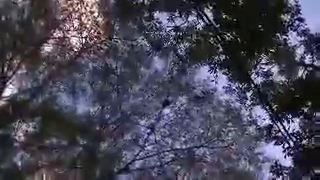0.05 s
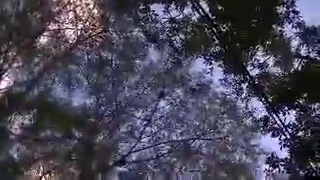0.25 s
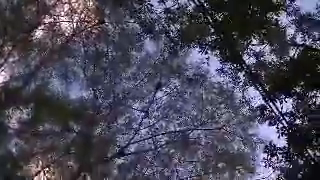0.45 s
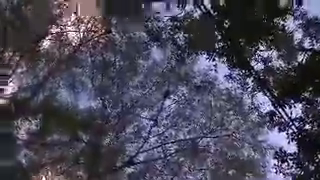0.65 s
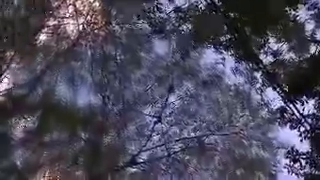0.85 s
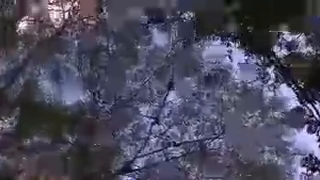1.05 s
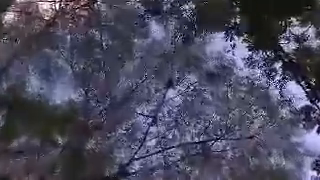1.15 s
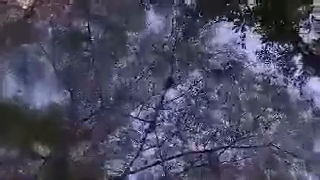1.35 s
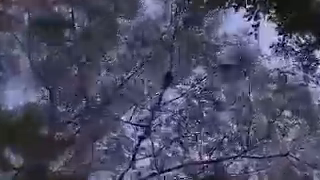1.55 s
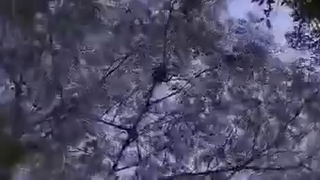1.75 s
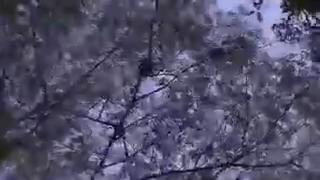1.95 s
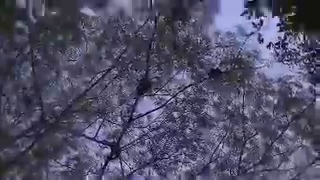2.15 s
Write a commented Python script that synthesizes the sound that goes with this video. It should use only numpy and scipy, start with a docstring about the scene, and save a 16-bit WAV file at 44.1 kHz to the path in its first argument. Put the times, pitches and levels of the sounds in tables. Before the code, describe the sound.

A howler monkey gives two short, hoarse barks over forest hiss, then a sharp snap.

```python
"""An earlier bark dies away among the trunks, over forest hiss, small chirps and a low motor hum.
A howler monkey then barks twice in the treetops, with faint ticks close by: the harmonics of its vocal
folds arch up and down through the throat's resonances, a rasp rides on top, and each hoot echoes.
After the barks a faint far tone stands out. Near the end one sharp snap rings briefly in its bright
modes, and a last tick follows."""
import sys
import numpy as np
from scipy import signal
from scipy.fft import rfft, irfft
from scipy.io import wavfile
from scipy.ndimage import uniform_filter1d

SR = 44100
rng = np.random.default_rng(int(sys.argv[2]) if len(sys.argv) > 2 else 0)


def log_audio(samples):
    """Write samples as a 16-bit WAV file to the path given in sys.argv[1]."""
    # one column per channel
    frames = np.atleast_2d(samples).T
    # limit to full scale, then quantise
    limited = np.clip(frames, -1, 1)
    pcm = np.round(limited * 32767).astype(np.int16)
    wavfile.write(sys.argv[1], SR, pcm)


N = 97020
T = np.arange(N) / SR

# course of each bark: t/s, f/Hz, level/dB, relative overtone level/dB, period doubling (0-1)
BARK_CONTOURS = [
    [(.236, 235, -29, 7, 0.02), (.245, 284.3, -21.5, -2, 0), (.252, 324.8, -17, 1.5, 0.06),
     (.264, 354.2, -19, 1, 0.22), (.28, 371.6, -19, 4.5, 0), (.298, 370, -21, -2.5, 0.18),
     (.313, 351.1, -19.5, -12.5, 0.85), (.332, 287.3, -24, -1, 0.1), (.345, 259.1, -20, 0, 0.16),
     (.356, 236.4, -24.5, -11.5, 0.7), (.376, 198.7, -28, -2.5, 0.23), (.405, 171.5, -38, -3.5, 0)],
    [(.714, 239.2, -45, 2, 0), (.724, 288.1, -18, -1, 0.13), (.73, 309.7, -20, 2.5, 0),
     (.742, 351.4, -17.5, 3, 0.2), (.76, 367.4, -18, 5, 0), (.783, 355.7, -18, -2.5, 0),
     (.798, 329, -23, -11, 1), (.81, 279.7, -26, 0.5, 0), (.822, 261.4, -24, -11, 0.98),
     (.836, 215.6, -29, -10.5, 0), (.875, 170, -48, -5, 0.5)],
]
# resonances of the throat: f/Hz, gain/dB
THROAT_RESPONSE = [(70, -57), (160, -8), (230, -8.5), (300, -2), (365, 4), (410, 10), (470, -11.5),
                   (530, -3), (600, -16.5), (725, -15), (770, -17.5), (810, 5.5), (880, 0.5), (980, -33.5),
                   (1090, -23), (1280, -56), (1390, -17), (1455, -11), (1560, -37.5), (1820, -34),
                   (2000, -49), (2100, -16.5), (2300, -72.5), (4000, -55)]
# spectrum of the rasp: f/Hz, relative level/dB
RASP_SPECTRUM = [(1000, -2.5), (2000, -8), (2500, -14.5), (3000, -10), (3650, -16), (4100, 7.5), (4400, 0),
                 (4680, -2.5), (5200, 6), (6000, -5), (6500, -8.5), (7150, -24.5), (8100, -15.5),
                 (10000, -27.5), (15000, -32)]
# reflections off trunks: delay t/s, gain/dB
TRUNK_ECHOES = [(.052, -20), (.1, -25.5), (.14, -32.5)]
# colour of the echoes and reverberation: f/Hz, gain/dB
WOODS_RESPONSE = [(180, 2), (290, -9), (365, 5), (430, 5.5), (520, -11.5), (720, 10), (830, -4), (1400, -4),
                  (3000, 10.5), (4200, -9), (6000, -4.5)]
# the snap's slip, break and two rebounds: t/s, relative level/dB
SNAP_BLOWS = [(1.792, -24), (1.7935, 0), (1.79469, -7), (1.7966, -21)]
# modes of the snap: f/Hz, relative level/dB, 60 dB decay time t/s
SNAP_RESONANCES = [(2100, -40, 0.0038), (2916, 0.5, 0.0091), (3560, 0.5, 0.0037), (4250, 2, 0.0032),
                   (5070, -0.5, 0.0059), (5890, -2, 0.0041), (7840, -11.5, 0.0029), (9200, -12, 0.0024),
                   (11400, -12, .003), (15600, -11, 0.0012)]
# scatter after the snap: f/Hz, relative level/dB
SCATTER_SPECTRUM = [(1200, -21), (2200, 6), (4000, -1), (4900, 3), (6500, -24), (14000, -28)]
# ticks: onset t/s, level/dB, decay constant t/s
TICK_BURSTS = [(0.289, -30.5, 0.0026), (0.426, -37, 0.0025), (.551, -42, .002), (0.563, -45, 0.0022),
               (0.596, -47.5, 0.0025), (0.623, -40.5, 0.0047), (0.651, -35.5, 0.0056),
               (1.956, -45.5, 0.0079)]
# spectrum of the ticks: f/Hz, relative level/dB
TICK_SPECTRUM = [(800, -55), (2000, 16), (3200, 7.5), (5000, 9), (6400, 10), (8000, -16.5), (13000, -18),
                 (16000, -57)]
# peaks of the chirps: t/s, level/dB
CHIRP_PEAKS = [(.026, -43), (.169, -47.5), (0.473, -45), (0.502, -47), (0.622, -39), (0.919, -41.5),
               (1.066, -46), (1.102, -46), (1.138, -43.5), (1.216, -43.5), (1.286, -44.5), (1.438, -43.5),
               (1.662, -42), (1.886, -44), (2.035, -45), (2.112, -43), (2.184, -46)]
# envelope of the far tone: t/s, level/dB
FAR_ENVELOPE = [(0, -73), (.85, -55), (1.1, -45), (1.55, -50), (1.8, -48), (2.2, -50.5)]
# peaks of low, distant swells: t/s, f/Hz, level/dB
SWELL_PEAKS = [(.63, 280, -53), (1.52, 182, -48.5), (1.85, 183, -50.5)]
# harmonics of the motor: f/Hz, rms level/dB
MOTOR_HARMONICS = [(26.9, -98), (53.8, -56), (80.7, -54.5), (107.7, -54), (134.6, -60)]
# spectrum of the forest hiss: f/Hz, relative level/dB
FOREST_SPECTRUM = [(25, -5), (60, -10.5), (150, -2.5), (220, 0.5), (350, 2.5), (480, -4.5), (700, -6.5),
                   (1020, -6), (1300, -13), (1800, -9), (2500, -18.5), (3700, -17.5), (4150, -14),
                   (4600, -20.5), (5400, -22.5), (7000, -28.5), (10000, -34.5), (15000, -43.5)]


def bark(contour):
    """Source and filter: the throat shapes the vocal folds' harmonics. Returns the hoot and its rasp."""
    times, hz, db, overtone_db, doubling = np.array(contour).T
    onset, attack_s = times[0], .012
    gate = np.sin(np.pi / 2 * np.clip(np.minimum(T - onset, times[-1] - T) / attack_s, 0, 1)) ** 2

    def along(values):
        return smooth(np.interp(T, times, values))

    glide_hz = along(hz)
    grunt = np.clip((269.8 - glide_hz) / 60, 0, 1)  # at low pitch the folds beat unevenly
    jitter = .0042 + .0353 * grunt
    pitch = glide_hz * (1 + jitter * wander(200))
    phase = 2 * np.pi * np.cumsum(pitch) / SR
    shimmer_db = .8 * wander(95)
    level = amp(along(db) + shimmer_db)

    def partial(k):
        return smooth(throat(k * pitch, onset)) * np.sin(k * phase)

    overtones = amp(along(overtone_db)) * sum(partial(k) for k in range(2, 12))
    # period doubling adds half-harmonics, chiefly as the pitch falls
    half_harmonics = np.clip(along(doubling), 0, 1) * sum(partial(k + .5) for k in range(1, 6))
    airflow = 1 + .8 * np.cos(phase)
    breath = amp(-31.5) * airflow * noise(THROAT_RESPONSE)
    hoot = level * (partial(1) + overtones + half_harmonics + breath)
    # the rasp swells in, then follows the hoot's level over a narrower range
    rasp_level = amp(-36) * (level / amp(db.max())) ** .68 * (1 - decay(onset, .0093))
    return gate * hoot, gate * rasp_level * rasp(pitch, glide_hz, phase, airflow)


def throat(hz, onset):
    """Cavity resonance: the throat's gain, plus an open-mouth formant that fades after the onset."""
    mouth_hz, width_hz, open_s = 640, 110, .026
    opening = amp(-4.5) * np.exp(-((T - onset) / open_s) ** 2)
    return gain_at(hz, THROAT_RESPONSE) + opening * np.exp(-((hz - mouth_hz) / width_hz) ** 2)


def rasp(pitch, glide_hz, phase, airflow):
    """Mixed excitation: high harmonics add in power to air noise pulsed by the vocal folds."""
    rest_hz, voiced_share = 324, .75
    formant_shift = (glide_hz / rest_hz) ** .15  # the buzz's resonances rise with pitch
    buzz = sum(gain_at(k * pitch / formant_shift, RASP_SPECTRUM)
               * np.sin(k * phase + 2 * np.pi * rng.random()) for k in range(5, 40))
    air = airflow * noise(RASP_SPECTRUM)
    return np.sqrt(voiced_share) * buzz / buzz.std() + np.sqrt(1 - voiced_share) * air


def woods(hoot, treble):
    """Reflection: the direct sound is followed by discrete trunk echoes and diffuse reverberation."""
    delay_s, build_s, t60_s = .035, .025, .25
    tail = noise(WOODS_RESPONSE) * decay(delay_s, t60_s / np.log(1000)) * (1 - decay(delay_s, build_s))
    reverberation = signal.fftconvolve(hoot + amp(8) * treble, tail / np.linalg.norm(tail))[:N]
    direct = hoot + treble
    echoes = sum(amp(db) * delay(direct, s) for s, db in TRUNK_ECHOES)
    return direct + amp(-14.5) * reverberation + coloured(echoes, WOODS_RESPONSE)


def monkey():
    """Reverberation outlasts its source: the tail of an earlier bark precedes two whole ones."""
    first, second = [woods(*bark(contour)) for contour in BARK_CONTOURS]
    earlier_onset_s, second_onset_s = -.16, BARK_CONTOURS[1][0][0]
    return first + second + amp(-5.5) * delay(second, earlier_onset_s - second_onset_s)


def snap():
    """Impulse response: quick blows excite damped modes; a weak scatter and one mode linger."""
    break_s = SNAP_BLOWS[1][0]
    scatter_t60_s, lingering_t60_s, lingering_hz = .031, .12, 4800
    scatter = amp(-23) * decay(break_s, scatter_t60_s / np.log(1000)) * noise(SCATTER_SPECTRUM)
    lingering = amp(-45) * decay(break_s, lingering_t60_s / np.log(1000))
    sound = scatter + lingering * np.sin(2 * np.pi * lingering_hz * T)
    age = T[:2000]
    ring = sum((-1) ** k * amp(db - 60 * age / t60) * np.sin(2 * np.pi * hz * age)
               for k, (hz, db, t60) in enumerate(SNAP_RESONANCES))
    for s, db in SNAP_BLOWS:
        start = round(s * SR)
        sound[start:start + len(age)] += amp(db - 8) * ring
    return signal.sosfilt(signal.butter(4, 1700, "high", fs=SR, output="sos"), sound)


def ticks():
    """Friction: small dry scrapes give decaying bursts of noise; the first one squeaks upward."""
    squeak_hz, rise_hz_per_s, squeak_s = 5880, 560000, .0012
    age = np.maximum(T - TICK_BURSTS[0][0], 0)
    swell = age / squeak_s * np.exp(1 - 2 * age / squeak_s)
    squeak = swell * np.sin(2 * np.pi * age * (squeak_hz + rise_hz_per_s * age / 2))
    bursts = sum(amp(db) * decay(s, decay_s) for s, db, decay_s in TICK_BURSTS)
    return bursts * noise(TICK_SPECTRUM) + amp(-24.5) * squeak


def chirps(hz=1798, width_s=.005):
    """Random phase modulation roughens brief pips on one pitch."""
    level = sum(amp(db) * gaussian(s, width_s) for s, db in CHIRP_PEAKS)
    return level * np.sin(2 * np.pi * hz * T + wander(300))


def far_tone(hz=299.2, waver=.006, flutter_db=1.5):
    """Slow amplitude and frequency modulation make a distant tone flutter and waver."""
    level = amp(np.interp(T, *np.array(FAR_ENVELOPE).T) + flutter_db * wander(17))
    return level * np.sin(2 * np.pi * hz * np.cumsum(1 + waver * wander(23)) / SR)


def far_swells(width_s=.041):
    """Gaussian envelopes raise and lower faint low tones of wandering phase."""
    return sum(amp(db) * gaussian(s, width_s) * np.sin(2 * np.pi * hz * T + .5 * wander(40))
               for s, hz, db in SWELL_PEAKS)


def motor_hum():
    """Periodic motion radiates a harmonic series."""
    return sum(amp(db) * np.sqrt(2) * np.cos(2 * np.pi * hz * T) for hz, db in MOTOR_HARMONICS)


def forest_hiss(flicker_db=.4):
    """Partial coherence: a common noise is widened by a weaker one in antiphase between the channels."""
    level = amp(-45.5 + flicker_db * wander(60))
    common = noise(FOREST_SPECTRUM)
    side = amp(-16) * noise(FOREST_SPECTRUM) * np.array([[1], [-1]])
    return level * (common + side)


def amp(db):
    """Amplitude ratio of a level in decibels."""
    return 10 ** (np.asarray(db) / 20)


def gain_at(hz, spectrum):
    """Gain interpolated on logarithmic axes from rows of f/Hz, level/dB."""
    f, db = np.array(spectrum).T
    return amp(np.interp(np.log(np.maximum(hz, 1)), np.log(f), db))


def coloured(x, spectrum):
    """Filtering by multiplication in the frequency domain."""
    return irfft(rfft(x) * gain_at(np.fft.rfftfreq(N, 1 / SR), spectrum), N)


def noise(spectrum):
    """Filtered white noise of unit rms."""
    x = coloured(rng.standard_normal(N), spectrum)
    return x / x.std()


def wander(rate_hz):
    """Low-pass random fluctuation of unit standard deviation."""
    x = irfft(rfft(rng.standard_normal(N)) / (1 + (np.fft.rfftfreq(N, 1 / SR) / rate_hz) ** 2) ** 2, N)
    return x / x.std()


def smooth(x):
    """Moving average over about 7 ms."""
    return uniform_filter1d(x, size=300)


def decay(start, seconds):
    """Exponential decay from a sudden onset."""
    return (T >= start) * np.exp(-np.maximum(T - start, 0) / seconds)


def gaussian(peak_s, width_s):
    """Bell-shaped envelope of unit height."""
    return np.exp(-.5 * ((T - peak_s) / width_s) ** 2)


def delay(x, seconds):
    """Translation in time; a negative delay advances the sound."""
    return np.interp(T - seconds, T, x, left=0, right=0)


def pan(x, left_db):
    """Level difference gives direction: the left channel exceeds the right by left_db."""
    return x * amp(np.array([[left_db], [-left_db]]) / 2)


def scene():
    """Superposition: monkey and background lie slightly left, the small sharp sounds near the centre."""
    distant = monkey() + forest_hiss() + motor_hum() + far_tone() + far_swells()
    close = snap() + ticks() + chirps()
    return pan(distant, left_db=1.2) + pan(close, left_db=-.6)


def record(dry):
    """Band limiting: a steep low-pass filter removes the highest treble."""
    cutoff_hz = 16200
    return signal.sosfilt(signal.ellip(8, .2, 70, cutoff_hz, fs=SR, output="sos"), dry)


dry = scene()
out = record(dry)
log_audio(out)
```